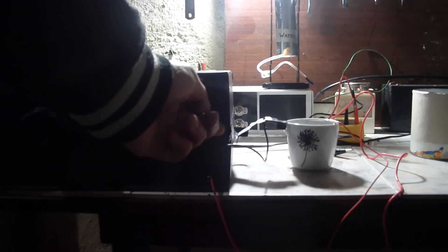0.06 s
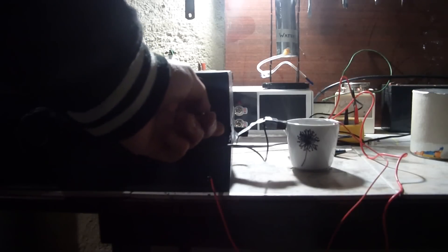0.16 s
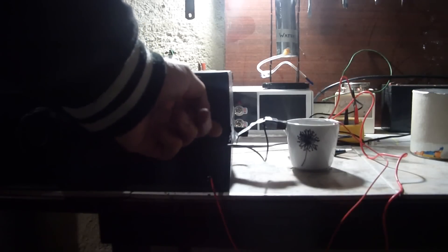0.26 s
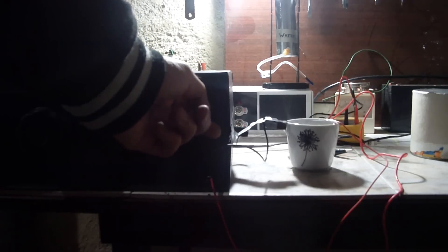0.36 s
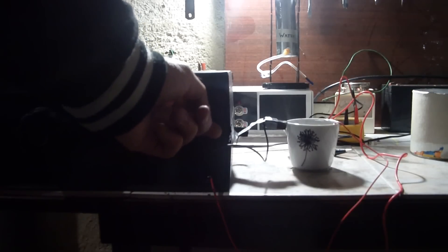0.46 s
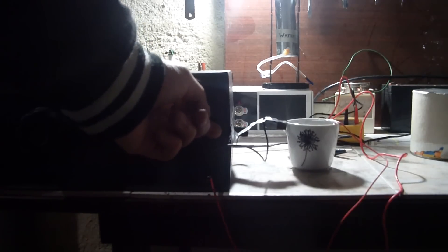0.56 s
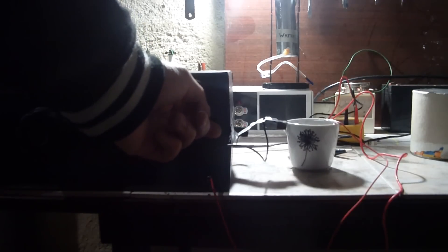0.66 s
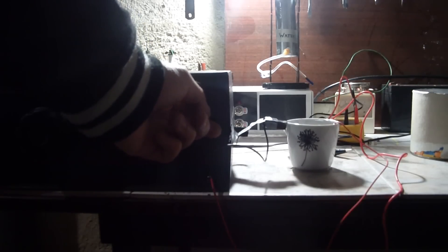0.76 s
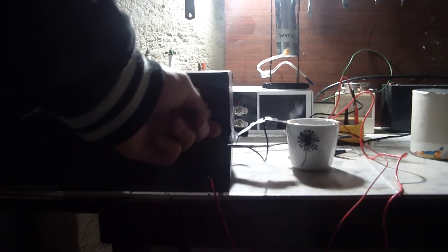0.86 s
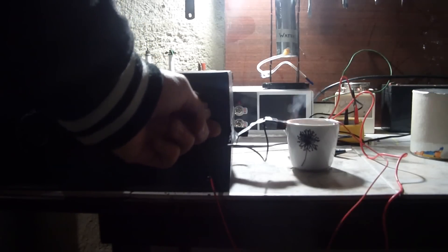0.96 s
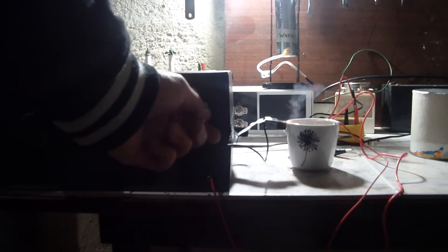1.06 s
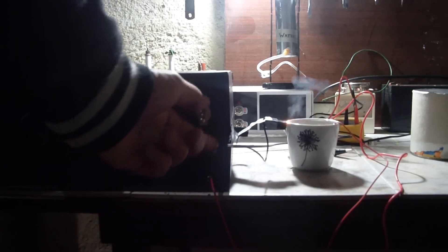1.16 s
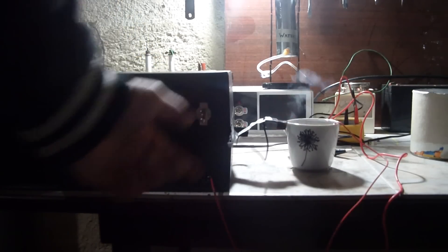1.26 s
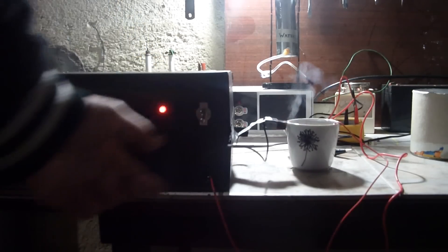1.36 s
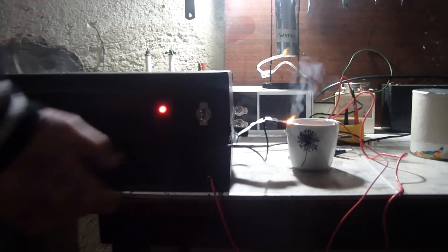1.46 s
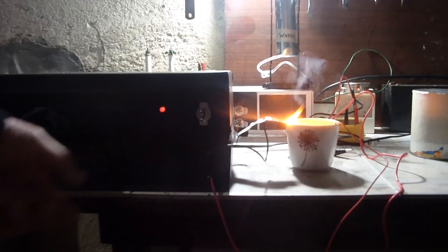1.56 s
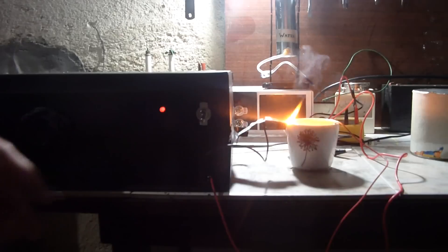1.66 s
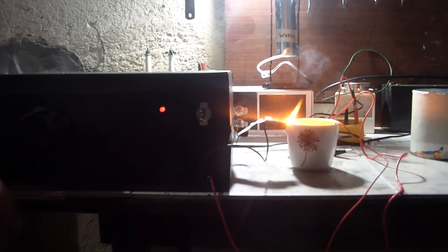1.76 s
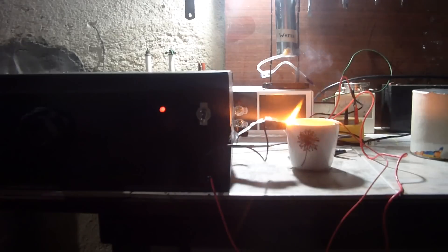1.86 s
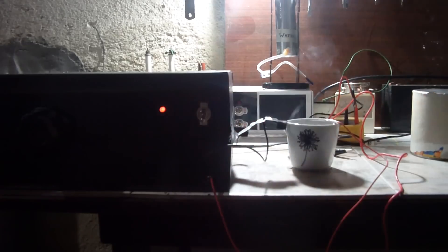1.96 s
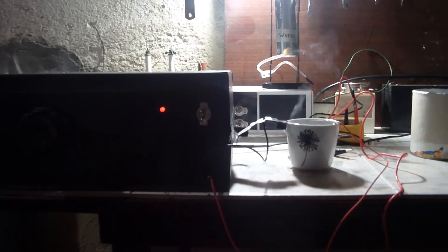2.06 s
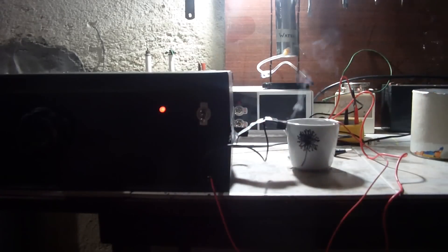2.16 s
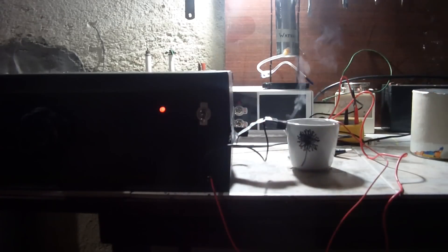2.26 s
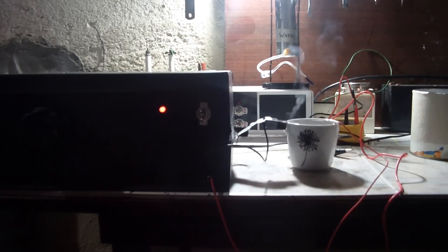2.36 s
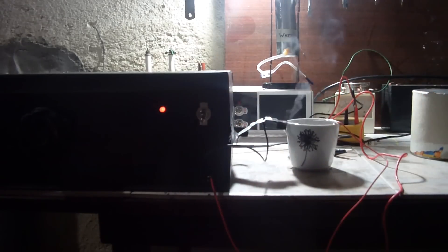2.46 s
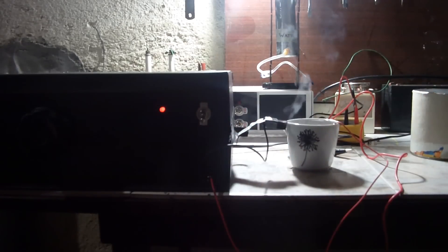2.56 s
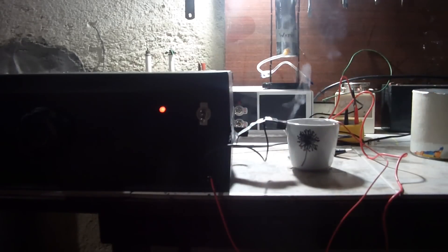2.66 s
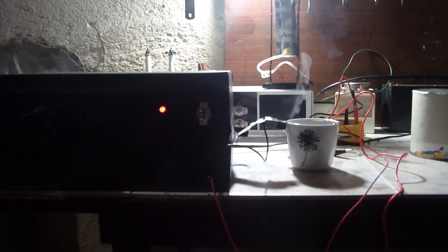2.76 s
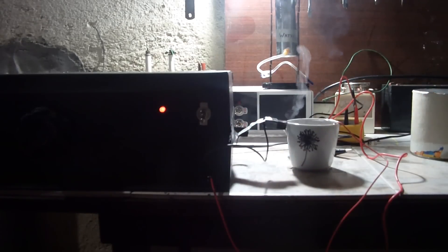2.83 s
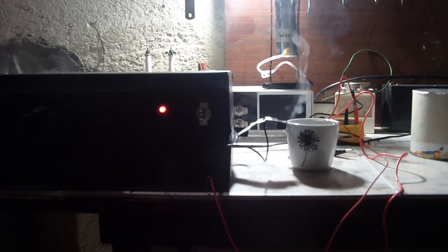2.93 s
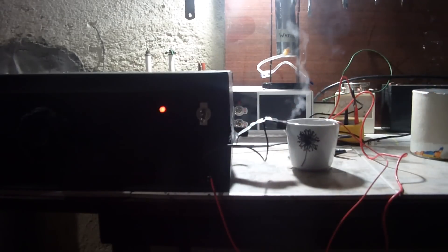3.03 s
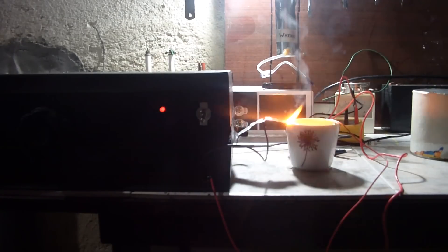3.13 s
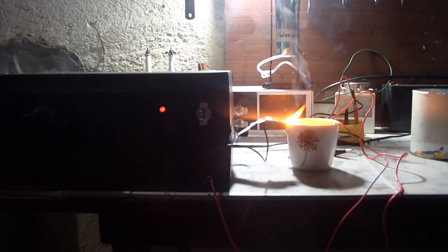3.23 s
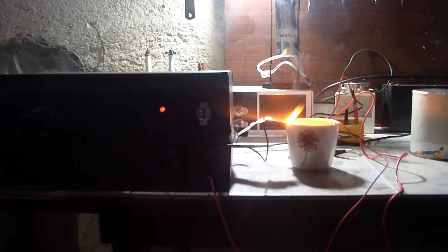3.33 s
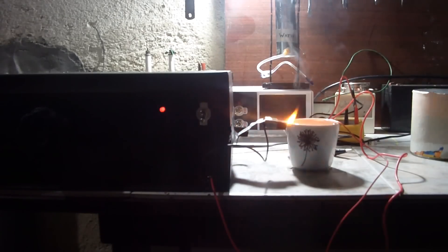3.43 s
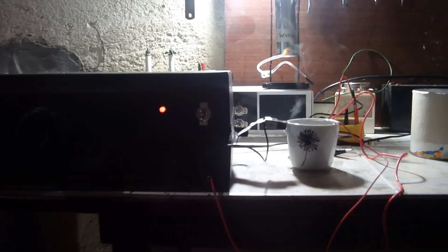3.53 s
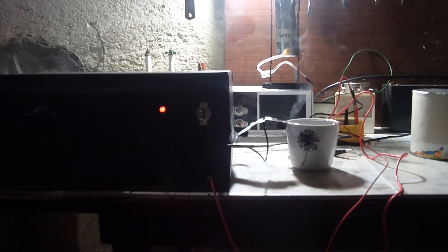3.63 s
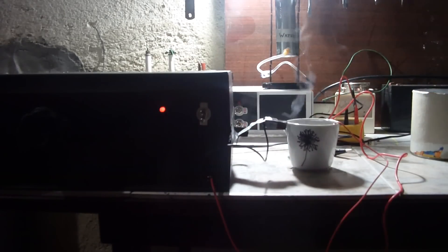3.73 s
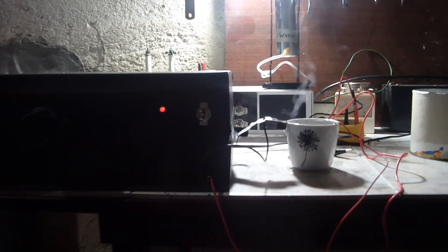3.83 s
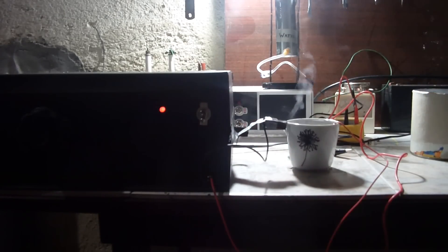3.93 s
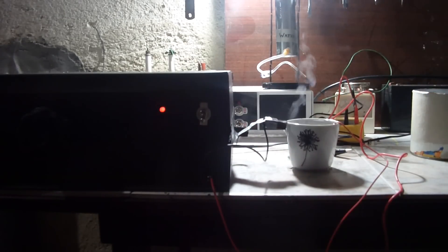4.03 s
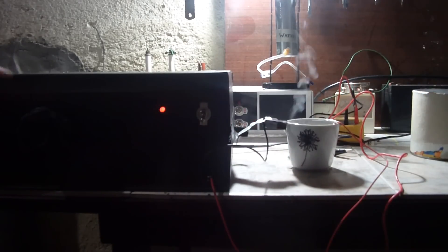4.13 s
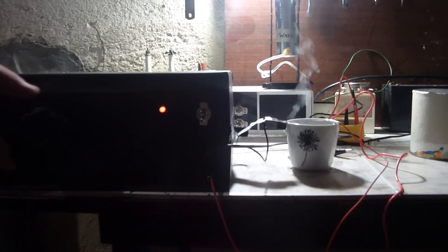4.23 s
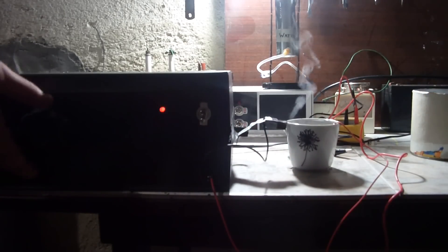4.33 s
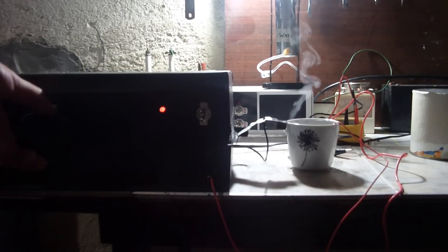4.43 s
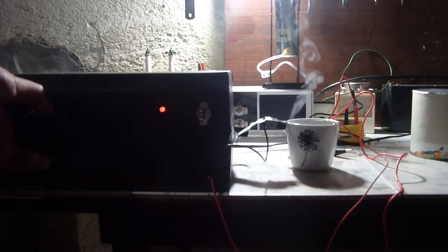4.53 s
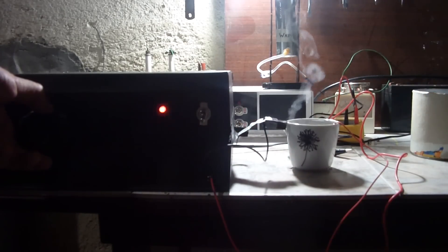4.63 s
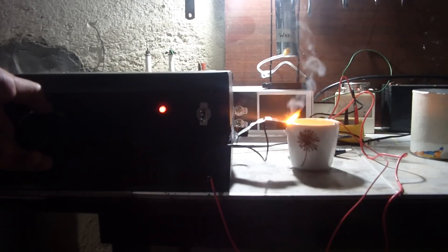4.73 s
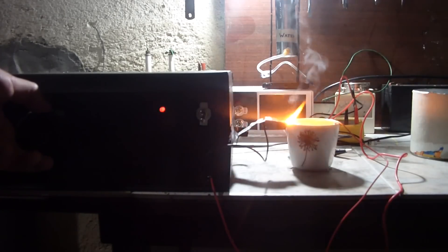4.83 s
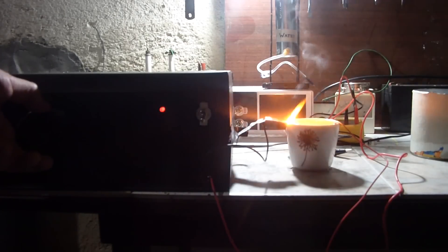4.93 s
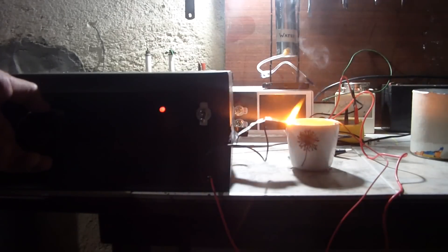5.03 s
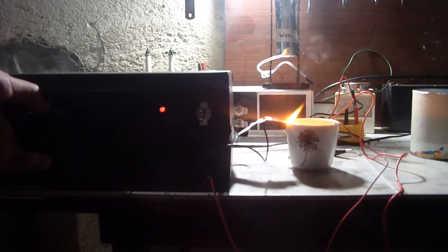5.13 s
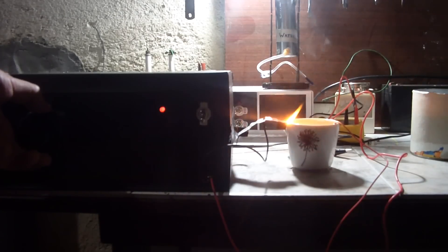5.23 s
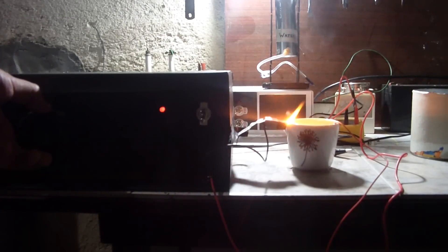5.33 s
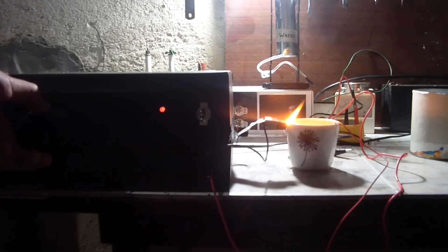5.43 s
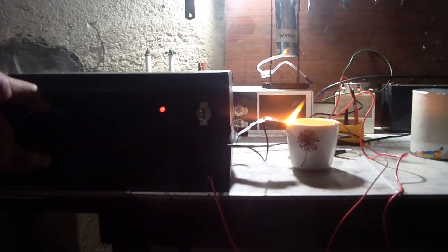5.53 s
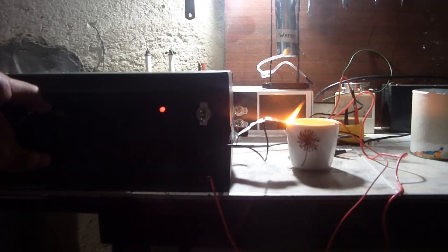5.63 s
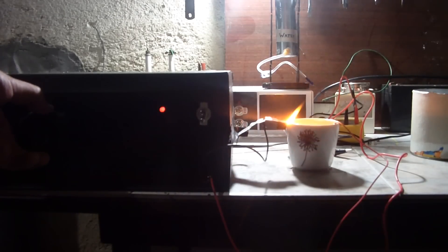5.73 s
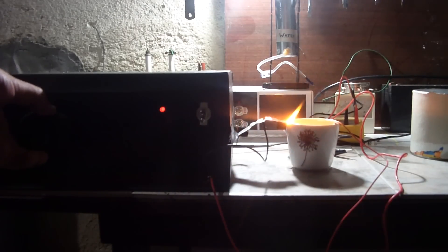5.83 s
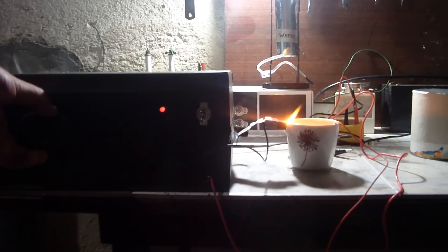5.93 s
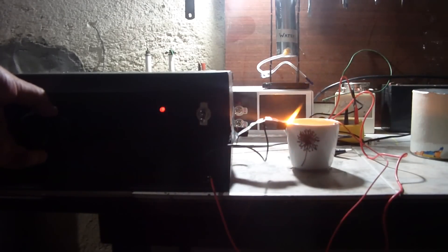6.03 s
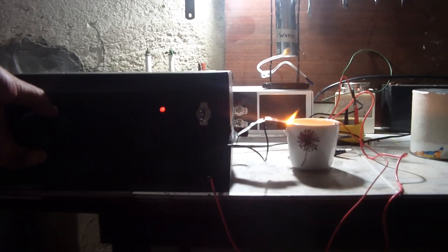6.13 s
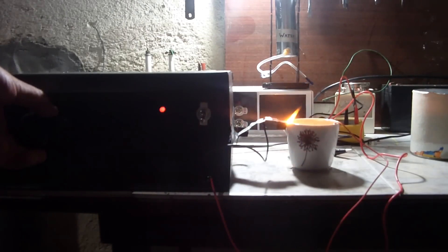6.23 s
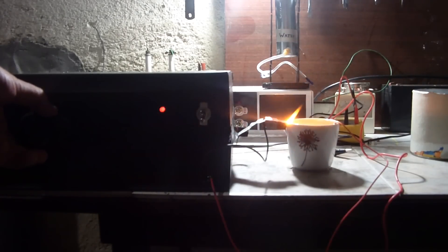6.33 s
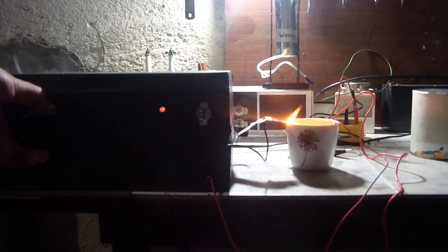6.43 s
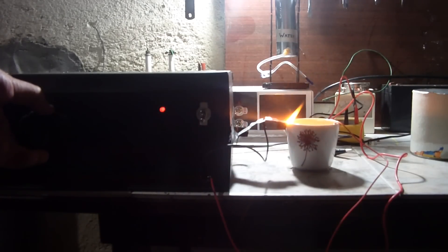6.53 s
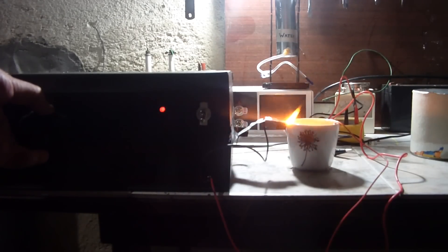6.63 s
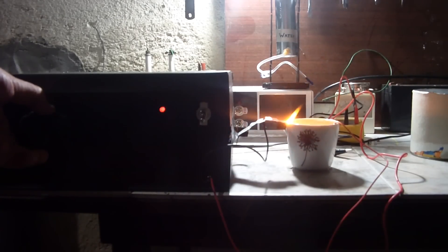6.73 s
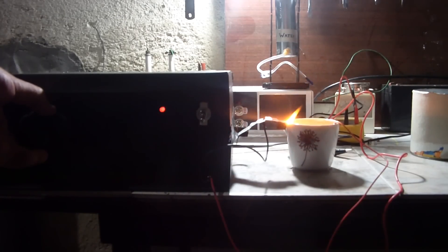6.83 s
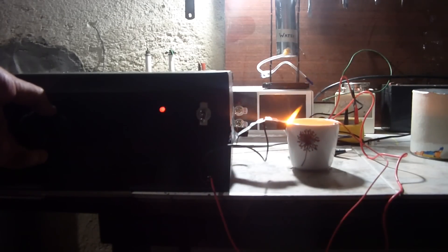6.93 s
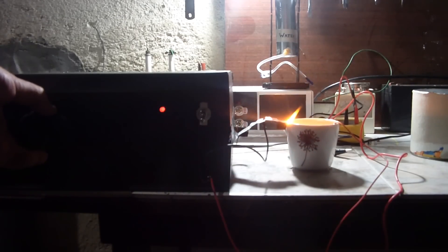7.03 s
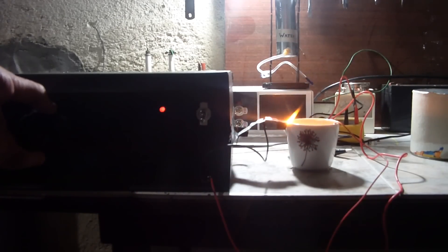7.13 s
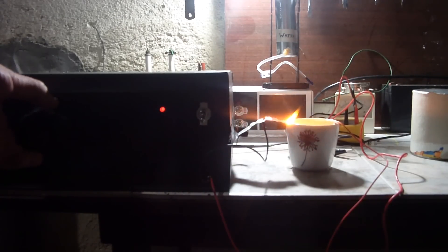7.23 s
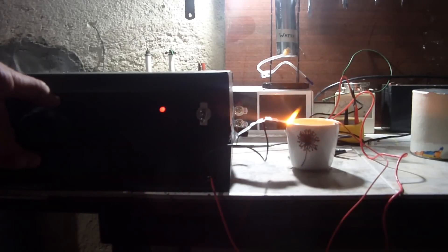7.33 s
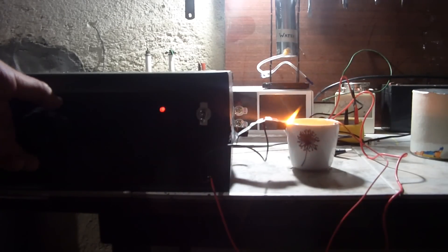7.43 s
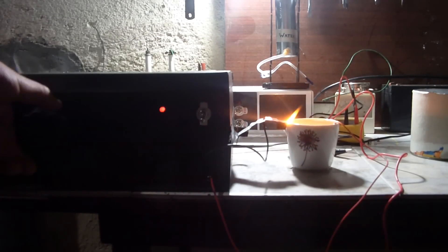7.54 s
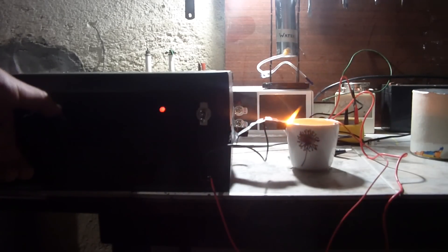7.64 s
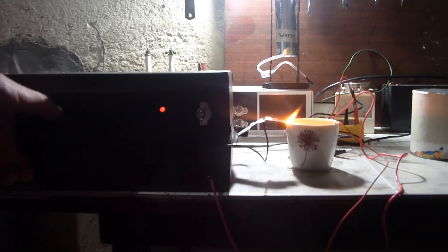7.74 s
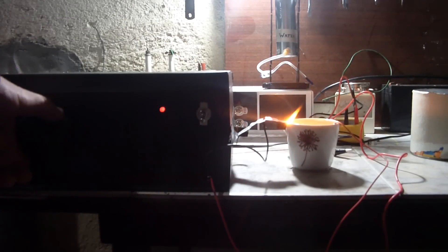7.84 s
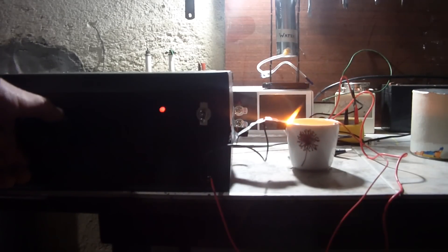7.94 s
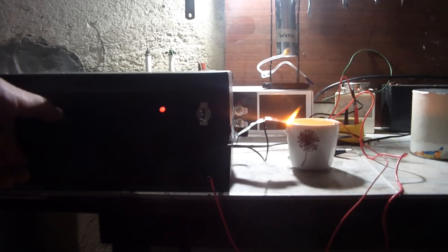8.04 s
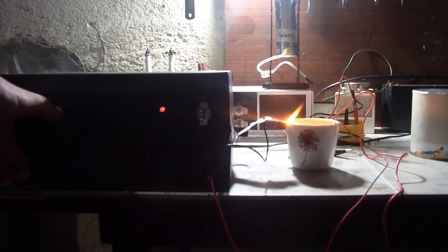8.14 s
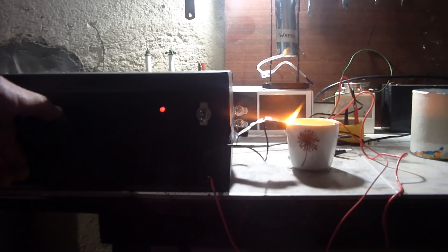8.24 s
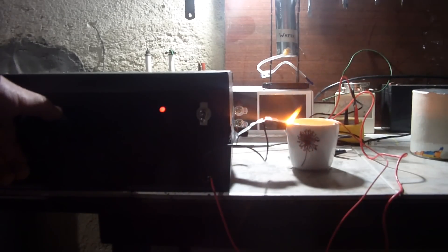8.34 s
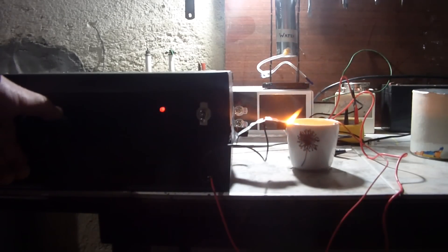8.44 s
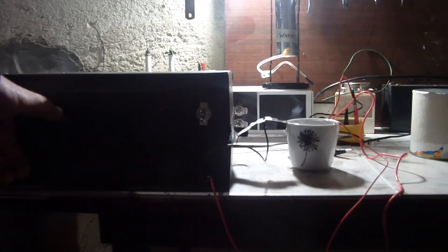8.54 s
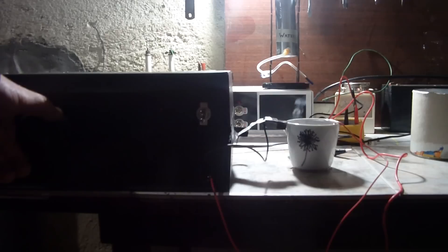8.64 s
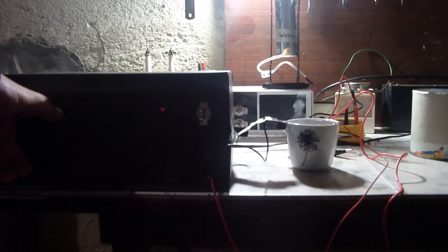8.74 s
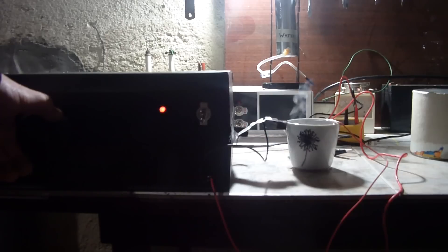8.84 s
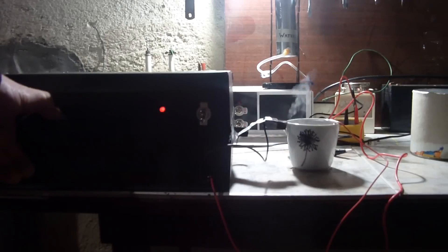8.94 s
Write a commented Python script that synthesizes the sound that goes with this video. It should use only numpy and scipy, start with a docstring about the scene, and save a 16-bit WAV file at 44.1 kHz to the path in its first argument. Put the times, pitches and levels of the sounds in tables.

```python
"""Over a dull rush of air, a hand knocks softly on a steel case; then a mains supply is switched on with a clack.
Sparks snap at a wire touching salt water in a cup; an arc flares up twice, then burns for almost four seconds.
The arc is noise made of tiny bursts, hissing and sputtering over a faint hum; hot water simmers as sparse crackle.
Knocks, clack and relay are short rattles, the case rings in decaying sines, and the room is small and hard."""
import sys
import numpy as np
from scipy import signal
from scipy.fft import rfft, irfft, next_fast_len
from scipy.io import wavfile
from scipy.ndimage import uniform_filter1d

SR = 44100
rng = np.random.default_rng(int(sys.argv[2]) if len(sys.argv) > 2 else 0)


def materialize(psi):
    """Save the field psi as 16-bit PCM at rate SR to the path in sys.argv[1].

    A 1-D psi becomes a single channel; in a 2-D psi each row is a channel.
    """
    bounded = np.clip(np.atleast_2d(psi).T, -1, 1)
    quanta = np.round(bounded * 32767).astype(np.int16)
    wavfile.write(sys.argv[1], SR, quanta)


N = 396459
TIME = np.arange(N) / SR  # s

# Levels are relative where a layer adds a trim of its own.
# steady rush of the room: [t/s, level/dB]
AIR_LEVEL = [(0, -53), (.2, -55), (.6, -55), (.9, -56.5), (3, -53), (8.99, -56)]
# colour of the rush: [f/Hz, level/dB]
AIR_COLOUR = [(16, -32), (30, -15), (48, -19), (117, -37.5), (134, -20.5), (198, -15.5), (255, -18),
              (377, -8.5), (665, -7.5), (892, -1.5), (1110, -7.5), (1540, -3.5), (1670, -4.5), (3000, -9.5),
              (3900, -67), (6600, -120)]
# colour of the flickering hiss above it: [f/Hz, level/dB]
TREBLE_AIR_COLOUR = [(1500, -27), (3000, -2.5), (4200, -2), (5600, -3.5), (6500, -3.5), (7400, -11.5),
                     (8700, -8.5), (9800, -21), (10800, -13.5), (12500, -23), (13300, -31)]
TREBLE_AIR_DB = -1
DRONE_HZ, DRONE_DB = 130, -87.5

# transformer hum: multiples of the mains frequency
HUM_ORDERS = (4, 6, 8, 12)
# mean level of each hum line: [level/dB]
HUM_LEVELS = [-74, -77.5, -78, -68]
MAINS_HZ, HUM_WAVER_DB = 50, 2.8

# fingers on the case: [t/s, level/dB, rattle decay/s, brightness f/Hz, boom level above knock/dB, boom f/Hz]
TOUCHES = [(.133, -34, 0.0042, 2100, -29, 207), (.627, -37, 0.0036, 2100, -13, 425),
           (.642, -30, 0.0039, 2200, -19, 383), (4.67, -48, 0.012, 6000, -13, 432)]
# resonances of the hand-damped case: [f/Hz, width/Hz, level/dB]
CASE_MODES = [(470, 120, -3), (805, 130, -3.5), (1115, 69, -1), (1545, 80, 9.5), (1730, 100, 6),
              (1800, 90, -5), (2060, 130, 1), (2140, 110, 2), (3440, 1100, -8)]
# the steel case rings on after the switch, and the 133.3 Hz row is a low thump of the transformer as it is
# switched on: [f/Hz, level/dB, t60/s]
CASE_RING = [(133.3, -64, 0.68), (218, -62.5, 0.76), (384, -51, 0.35), (571, -45.5, 0.36),
             (730, -39.5, 0.45), (1066, -18.5, 0.06), (1066, -38, 0.57), (1669, -40, 0.42),
             (1810, -38, 0.33), (2130, -15.5, 0.065), (2730, -37, .18), (3120, -19, .05)]
PANEL_OVERTONE, PANEL_OVERTONE_DB = 1.95, -9  # frequency ratio, level above the boom
SQUEAK_HZ, SQUEAK_DB, RUB_DB = 434, -56.5, -60
SQUEAK_MIDDLE_S, SQUEAK_HALF_S = 4.684, .027

# the switch lets go, slams shut and bounces: [t/s, level/dB, rattle decay/s, brightness f/Hz]
CLACKS = [(0.9545, -24, 0.0016, 9000), (0.9563, -10, 0.0032, 11000), (0.9588, -11.5, 0.0012, 6000),
          (0.9622, -12.5, 0.00095, 8000)]
# colour of the clack: [f/Hz, level/dB]
CLACK_COLOUR = [(40, -34), (150, -37), (220, -31), (280, -27), (400, -12.5), (500, -19), (570, -17),
                (650, -24), (880, -9), (980, -13), (1080, 2), (1230, -7), (1350, -7), (1600, 4.5),
                (2200, -1.5), (3150, -2.5), (4100, -2.5), (5600, -3), (7000, -15), (8800, -14.5),
                (14500, -43)]
# the relay in the supply chatters: [t/s, level/dB, rattle decay/s, brightness f/Hz]
RELAY = [(3.988, -26.5, 0.00076, 10000), (3.9924, -29, .0005, 9000), (3.9976, -28, 0.0071, 9000),
         (4.0014, -24, .001, 8000), (4.009, -29, 0.0043, 7000), (4.0186, -31, .001, 9000)]
# colour of the relay: [f/Hz, level/dB]
RELAY_COLOUR = [(200, -45), (450, -22), (600, -13), (900, -7), (1300, 0), (1680, 4), (2100, -2.5),
                (3000, -1.5), (4000, -5), (6000, -14.5), (9000, -28), (13000, -57)]
TICK_DB = 15  # first tick above the start of its rattle, before both are dulled

# water simmering round the hot wire: [t/s, level/dB]
SIMMER_LEVEL = [(1.2, -48), (2.25, -51), (2.7, -54), (3.0, -50.5), (3.8, -49.5), (4.25, -46.5), (4.62, -53)]
# colour of the simmer: [f/Hz, level/dB]
FIZZ_COLOUR = [(290, -47), (500, -31), (1120, -6.5), (1420, -5), (3470, 1), (4990, -4.5), (5980, -2.5),
               (12500, -27), (14000, -65)]
# sparks at the wire, and one very faint crackle at 2.9 s: [t/s, level/dB]
SPARKS_AND_CRACKLE = [(1.3424, -21), (1.5423, -18.5), (1.628, -19.5), (1.6443, -19), (2.9, -41),
                      (3.031, -24), (3.1213, -29.5), (3.2451, -18.5), (4.178, -38), (4.4410, -36),
                      (4.814, -33.5), (4.8955, -16.5)]
# colour of these snaps: [f/Hz, level/dB]
SPARK_COLOUR = [(120, -101), (200, -52), (1150, -11), (1560, -9.5), (3030, -2), (4930, -6), (6350, -7.5),
                (7330, -15), (8770, -18.5), (14800, -44)]

# arc burns: [strikes t/s, goes out t/s, hiss level/dB, crest gain/dB]
BURNS = [(1.637, 2.087, -45, 10.5), (3.244, 3.601, -40.5, 16), (4.892, 8.628, -37, 6)]
# colour of the arc: [f/Hz, level/dB]
ARC_COLOUR = [(59, -72), (100, -45), (191, -48), (380, -28.5), (520, -27.5), (860, -14), (965, -17),
              (1060, -13), (1390, -12), (2030, -3.5), (2900, -3), (3400, -2.1), (4130, -3.5), (4880, -8),
              (6150, -6.5), (7420, -13.5), (8590, -17), (13300, -35), (14800, -72)]
# growth of the arc: [t/s, gain/dB]
GROWTH = [(5.0, -3.5), (5.48, 1), (5.62, 6), (6.1, 5), (6.3, 3), (6.6, 4.5), (6.8, 9), (7.7, 8), (8.35, 8),
          (8.6, 3.5)]
# the arc falters: [t/s, depth/dB, half length/s]
FALTERS = [(6.777, 5, .012), (7.024, 12, 0.0067), (7.274, 10, 0.012), (7.419, 10.5, 0.012),
           (7.474, 13, 0.0055), (7.565, 15, 0.0086), (7.642, 10, 0.016), (7.869, 6.5, 0.022),
           (8.068, 4, 0.014), (8.437, 6, 0.031), (8.557, 3, 0.011)]
# brief swells of the arc, and one slight dip at 5.21 s: [t/s, gain/dB]
SWELLS_AND_DIP = [(1.97, 2.5), (2.065, 9), (3.4, 3.5), (3.52, 2), (5.21, -1.5), (5.374, 8), (6.75, 2.5),
                  (6.89, 2.5), (7.37, 3), (7.69, 4), (8.5, 5)]
SWELL_HALF_S, STRIKE_S, QUENCH_S = 0.012, 0.0039, 0.013
KICK_DB, KICK_S = 11.5, 0.032  # every burn starts with a kick that soon fades
# then it swells to a bright crest as the water at the wire boils away
CREST_AGE_S, CREST_RISE_S, CREST_FALL_S, CREST_SIZZLE_DB = 0.335, 0.11, 0.089, 5.5
SETTLE_AGE_S, SETTLE_S, SETTLE_SIZZLE_DB = 0.53, 0.17, -5.5  # an older burn loses its fine sizzle
# roar and sizzle: level when the hiss is at its usual level, and share of its swing that they follow
USUAL_HISS_DB = -36.5
ROAR_DB, ROAR_FOLLOWS = -48.5, 0.41
SIZZLE_DB, SIZZLE_FOLLOWS = -35.5, 0.23
SPUTTER_DB = 1.15  # slower part of the random unsteadiness, rms

# echoes from bench, case and wall: [delay/s, signed relative strength]
ECHOES = [(.001488, .2), (.001696, .18), (.003104, -.2), (.003764, -.22), (.004036, -.2), (.0058, .15),
          (.006856, .32), (.007808, .3), (.009264, -.2), (.01116, .17), (.011756, .18), (.0121, .2)]
# decay of the room: [f/Hz, t60/s]
ROOM_T60 = [(200, 0.41), (530, 0.79), (1390, 0.34), (3680, 0.3), (9700, 0.24)]
EVEN_HZ = 90  # base width of the bands over which rattles and echoes are evened
# stereo width: [f/Hz, left-right likeness 0..1]
LIKENESS = [(60, 0.78), (300, 0.94), (1400, 0.93), (3000, 0.84), (4600, 0.95), (6500, 0.59), (9000, 0.36),
            (14000, .2)]
# stereo balance: [f/Hz, left minus right level/dB]
LEAN = [(100, 0), (500, 2.5), (1100, 2.5), (2400, 2.5), (3400, -0.5), (4600, 1.5), (5600, 6.5), (8500, 7.5),
        (10500, 4.5), (12500, -0.5)]
# stereo phase: [f/Hz, lead of the left side/rad]
LEAD = [(100, -0.071), (3600, 0.062), (4600, 0.81), (5400, 0.81), (7000, 0.15), (8300, 0.98), (9200, -1.35),
        (11000, -1.4), (13000, -0.15)]
# dips of the microphone ports: [f/Hz, width/Hz]
PORT_DIPS = [(1400, 131), (4900, 600), (7400, 1350), (9880, 1040), (11950, 1030)]
CUTOFF_HZ = 14700


def from_db(db):
    """Decibels to amplitude gain."""
    return 10 ** (np.asarray(db) / 20)


def rms_one(x):
    """Scale to rms 1."""
    return x / np.sqrt(np.mean(x ** 2) + 1e-20)


def at_hz(points, hz):
    """Read a curve on a log-frequency axis."""
    point_hz, values = np.array(points)[:, 0], np.array(points)[:, 1]
    return np.interp(np.log(hz + 1), np.log(point_hz), values)


def over_time(points):
    """Draw straight lines between [t/s, value] points."""
    return np.interp(TIME, *np.transpose(points))


def bump(s, half_s):
    """A smooth bell-shaped rise and fall of height 1 round time s."""
    return np.exp(-np.minimum(((TIME - s) / half_s) ** 2 / 2, 20))


def sine(hz):
    """A steady sine of amplitude 1."""
    return np.sin(2 * np.pi * hz * TIME)


def butter(x, hz, kind):
    """Second-order low- or high-pass."""
    return signal.sosfilt(signal.butter(2, min(hz, SR / 2 - 1), kind, fs=SR, output="sos"), x + 1e-18)


def drift(rate):
    """Smooth random wander of rms 1, from noise through two equal poles; a higher rate (Hz) is quicker."""
    step = 40  # samples between drawn points
    r = np.exp(-2 * step * np.pi * rate / SR)
    noise = rng.standard_normal(N // step + 2002)
    slow = rms_one(signal.lfilter([1], [1, -2 * r, r * r], noise)[2000:])
    return np.interp(np.arange(N) / step, np.arange(len(slow)), slow)


def shaped(x, level_db, size=4096):
    """Minimum-phase filter whose gain in dB is a function of frequency."""
    cepstrum = irfft(np.log(from_db(level_db(np.fft.rfftfreq(size, 1 / SR)))))
    # fold the cepstrum onto positive times to make the filter causal
    cepstrum[1:size // 2] *= 2
    cepstrum[size // 2 + 1:] = 0
    response = irfft(np.exp(rfft(cepstrum)))
    return signal.oaconvolve(x, response)[:len(x)]


def colour(x, spectrum):
    """Give a white signal a spectrum and keep its power."""
    power = np.mean(from_db(at_hz(spectrum, np.arange(0, SR / 2, 10))) ** 2)
    return shaped(x, lambda hz: at_hz(spectrum, hz)) / np.sqrt(power)


def resonate(x, modes):
    """Parallel two-pole resonances that keep the power of white noise."""
    out, power = 0, 0
    for hz, width, db in modes:
        r = np.exp(-np.pi * width / SR)
        zeros = [(1 - r * r) / 2, 0, (r * r - 1) / 2]
        poles = [1, -2 * r * np.cos(2 * np.pi * hz / SR), r * r]
        out = out + from_db(db) * signal.lfilter(zeros, poles, x + 1e-18)
        power += from_db(db) ** 2 * (1 - r)
    return out / np.sqrt(power)


def band_power(x, width_hz):
    """Power spectrum averaged over the channels and over bands of a given width."""
    power = np.mean(np.abs(rfft(np.atleast_2d(x))) ** 2, axis=0)
    return uniform_filter1d(power, round(width_hz * x.shape[-1] / SR))


def evened(x, power):
    """Level the chance peaks of a short sound (channels x samples) to a given power spectrum."""
    hz = np.fft.rfftfreq(x.shape[1], 1 / SR)
    gain_db = 10 * np.log10((power + 1e-9) / (band_power(x, EVEN_HZ) + 1e-9))
    return np.array([shaped(side, lambda f: np.interp(f, hz, gain_db)) for side in x])


def stereo_noise(size):
    """White noise whose left-right likeness varies with frequency, by mixing mid and side noise."""
    alike = np.clip(at_hz(LIKENESS, np.fft.rfftfreq(2 * size, 1 / SR)), 0, 1)
    mid, side = rfft(rng.standard_normal((2, 2 * size)))
    spectrum = np.sqrt((1 + alike) / 2) * mid + np.sqrt((1 - alike) / 2) * side * [[1], [-1]]
    return irfft(spectrum)[:, :size]


def crackle(per_s, spread_db):
    """Tiny impulses at random moments, mostly weak and a few strong; rms 1."""
    sizes = from_db(spread_db * np.minimum(rng.exponential(1, N), 4)) * rng.choice([-1, 1], N)
    return rms_one(sizes * (rng.random(N) < per_s / SR))


def contact(s, db, seconds, bright_hz, size=8192):
    """Surfaces meet with one tick and a short decaying rattle, duller when they are soft."""
    rattle = rng.standard_normal(size) * np.exp(-np.arange(size) / SR / seconds)
    rattle[0] = from_db(TICK_DB)
    dulled = butter(rattle, bright_hz, "low")
    return from_db(db) * np.pad(dulled, (round(s * SR), 0))[:size]


def blow(contacts):
    """A quick run of contacts makes one broadband crack, evened so that it has no pitch of its own."""
    start = contacts[0][0]
    crack = sum(contact(max(s - start, 0), *rest) for s, *rest in contacts)
    crack = evened(crack[None], band_power(crack, 20 * EVEN_HZ))[0]
    return np.pad(crack, (round(start * SR), N))[:N]


def ring(s, hz, db, t60, size=32768):
    """One mode, struck at time s: a decaying sine that builds up over a few cycles."""
    age = np.arange(size) / SR
    decay = from_db(db - 60 * age / t60)
    tone = np.sin(2 * np.pi * hz * age) * decay * (1 - np.exp(-age * hz / 2))
    return np.pad(tone, (round(s * SR), N))[:N]


def workshop(x, tail_db, build_s, size=20000):
    """Direct sound, near echoes, then a diffuse tail that dies band by band and favours no single pitch."""
    age, hz = np.arange(size) / SR, np.fft.rfftfreq(size, 1 / SR)
    noise, centres = rfft(stereo_noise(size)), np.geomspace(125, 16000, 8)
    tail = 0
    for centre, share in zip(centres, np.eye(len(centres))):
        band = irfft(noise * at_hz(np.c_[centres, share], hz))
        tail = tail + band * from_db(-60 * age / at_hz(ROOM_T60, centre))
    tail = tail * (1 - np.exp(-age / build_s))
    tail = from_db(tail_db) * rms_one(tail) / np.sqrt(size)
    echoes = sum(gain * np.exp(-2j * np.pi * hz * delay) for delay, gain in ECHOES)
    near = irfft(1 + from_db(-1.0) * echoes) * (age < size / SR / 2)
    smooth_power = band_power(near, EVEN_HZ) + band_power(tail, 10 * EVEN_HZ)
    response = rms_one(evened(near + tail, smooth_power)) / np.sqrt(size)
    return signal.oaconvolve(x[None], response, axes=1)[:, :N]


def air():
    """A steady dull rush with a faint, slightly flickering hiss above it, both coloured stereo noise."""
    low, high = (stereo_noise(next_fast_len(N))[:, :N] for layer in range(2))
    flicker = from_db(TREBLE_AIR_DB + 1.1 * drift(35))
    rush = np.array([colour(a, AIR_COLOUR) + flicker * colour(b, TREBLE_AIR_COLOUR)
                     for a, b in zip(low, high)])
    return from_db(over_time(AIR_LEVEL) - 3.5) * rush


def drone():
    """A faint steady sine in the room."""
    return from_db(DRONE_DB) * sine(DRONE_HZ)


def hum(lit):
    """The loaded transformer hums in mains harmonics that swell just after the arc strikes and waver at random."""
    lines = 0
    for order, db in zip(HUM_ORDERS, HUM_LEVELS):
        level = from_db(db + HUM_WAVER_DB * drift(10.0))
        lines = lines + level * np.sin(2 * np.pi * order * MAINS_HZ * TIME + .5 * drift(3.4))
    return butter(lit, 4.3, "low") * lines


def fingers():
    """Soft knocks and rubs stir the resonances of the hand-damped case."""
    knocks = sum(blow([row[:4]]) for row in TOUCHES)
    return from_db(-2.0) * resonate(knocks, CASE_MODES)


def case():
    """The sheet steel rings after the switch over a low transformer thump, booms in two modes under the
    fingers, squeaks under a thumb."""
    slam_s = CLACKS[1][0]
    steel = sum(ring(slam_s, *mode) for mode in CASE_RING)
    booms = 0
    for s, db, seconds, bright_hz, boom_db, hz in TOUCHES:
        booms = booms + ring(s, hz, db + boom_db, t60=0.3)
        booms = booms + ring(s, hz * PANEL_OVERTONE, db + boom_db + PANEL_OVERTONE_DB, t60=0.59)
    squeak = from_db(SQUEAK_DB) * np.sin(2 * np.pi * SQUEAK_HZ * TIME + 0.85 * drift(28))
    grains = butter(butter(crackle(per_s=1800, spread_db=5.0), 900, "high"), 4000, "low")
    rustle = from_db(RUB_DB) * rms_one(grains)
    return steel + booms + bump(SQUEAK_MIDDLE_S, SQUEAK_HALF_S) * (squeak + rustle)


def switch():
    """Sprung contacts slam shut with a crack and bounce; later a relay clatters inside the supply."""
    return from_db(2.0) * colour(blow(CLACKS), CLACK_COLOUR) + colour(blow(RELAY), RELAY_COLOUR)


def simmer():
    """Small steam bubbles burst at random round the hot wire, from switch-on until just after the last burn."""
    hot = np.interp(TIME, [.96, 1.1, 8.6, 8.8], [0, 1, 1, 0])
    bubbles = crackle(per_s=830, spread_db=4.0) * from_db(2.1 * drift(12))
    return hot * from_db(over_time(SIMMER_LEVEL) - 4.5) * colour(bubbles, FIZZ_COLOUR)


def sparks():
    """Each spark at the wire, and one very faint crackle at 2.9 s, is one sharp pressure pulse."""
    pulses = np.zeros(N)
    for s, db in SPARKS_AND_CRACKLE:
        pulses[round(s * SR)] += from_db(db + 19.5)
    return colour(pulses, SPARK_COLOUR)


def burning():
    """Each burn kicks, swells to a crest and settles; returns gains of hiss, roar, sizzle and current on/off."""
    swells_db = sum(db * bump(s, SWELL_HALF_S) for s, db in SWELLS_AND_DIP)
    falters_db = sum(db * bump(s, half_s) for s, db, half_s in FALTERS)
    drive_db = over_time(GROWTH) + swells_db - falters_db
    gains = 0
    for start, end, db, crest_db in BURNS:
        age = np.maximum(TIME - start, 0)
        lit = np.interp(TIME, [start, start + STRIKE_S, end, end + QUENCH_S], [0, 1, 1, 0])
        past_crest = age - CREST_AGE_S
        crest = np.exp(-np.maximum(-past_crest / CREST_RISE_S, past_crest / CREST_FALL_S))
        settled = .5 + .5 * np.tanh((age - SETTLE_AGE_S) / SETTLE_S)
        hiss_db = db + drive_db + KICK_DB * np.exp(-age / KICK_S) + crest_db * crest
        swing_db = hiss_db - USUAL_HISS_DB
        roar_db = ROAR_DB + ROAR_FOLLOWS * swing_db
        sizzle_db = SIZZLE_DB + SIZZLE_FOLLOWS * swing_db
        sizzle_db = sizzle_db + CREST_SIZZLE_DB * crest + SETTLE_SIZZLE_DB * settled
        gains = gains + lit * np.array([from_db(hiss_db), from_db(roar_db), from_db(sizzle_db), np.ones(N)])
    return gains


def arc(hiss, roar, sizzle):
    """Water flashes to steam in thousands of tiny bursts a second, a little harder on each mains half wave."""
    bursts = crackle(per_s=3000, spread_db=3.0) + from_db(-9) * rng.standard_normal(N)
    sputter_db = SPUTTER_DB * drift(26) + 1.0 * drift(107) + .5 * sine(2 * MAINS_HZ)
    steam = colour(rms_one(bursts * from_db(sputter_db)), ARC_COLOUR)
    low, high = butter(steam, 1450, "low"), butter(steam, 6180, "high")
    middle = butter(butter(steam, 1570, "high"), 4420, "low")
    # the outer bands are flipped in polarity
    return from_db(2.0) * hiss * middle - from_db(13) * roar * low - from_db(8.5) * sizzle * high


def scene():
    """The arc hisses at wire and water beside the supply; wire, water, switch and fingers get own room paths."""
    hiss, roar, sizzle, lit = burning()
    wire = from_db(0.1) * arc(hiss, roar, sizzle) + sparks()
    water = from_db(-9.0) * arc(hiss, roar, sizzle) + simmer()
    cup = workshop(wire, tail_db=0.5, build_s=0.0008) + workshop(water, tail_db=-0.5, build_s=0.0028)
    clatter = workshop(switch(), tail_db=0.0, build_s=0.0011)
    touches = workshop(fingers(), tail_db=-2.0, build_s=0.00082)
    supply = clatter + touches + case() + hum(lit)  # case and hum stay free of room echo
    return cup + supply + air() + drone()


def record(dry):
    """The two microphone ports differ in level and phase and cut narrow dips; the top is cut."""
    size = next_fast_len(N + 4096)
    hz, side = np.fft.rfftfreq(size, 1 / SR), np.array([[.5], [-.5]])  # left, right
    balance = from_db(side * at_hz(LEAN, hz)) * np.exp(1j * side * at_hz(LEAD, hz))
    out = irfft(rfft(dry, size) * balance, size)[:, :N]
    for dip_hz, width in PORT_DIPS:
        dipped = signal.lfilter(*signal.iirnotch(dip_hz, dip_hz / width, fs=SR), out)
        out = dipped + from_db(-45) * (out - dipped)  # the dip is 45 dB deep
    return signal.sosfilt(signal.ellip(10, .2, 80, CUTOFF_HZ, fs=SR, output="sos"), out)


dry = scene()
out = record(dry)
materialize(out)
```